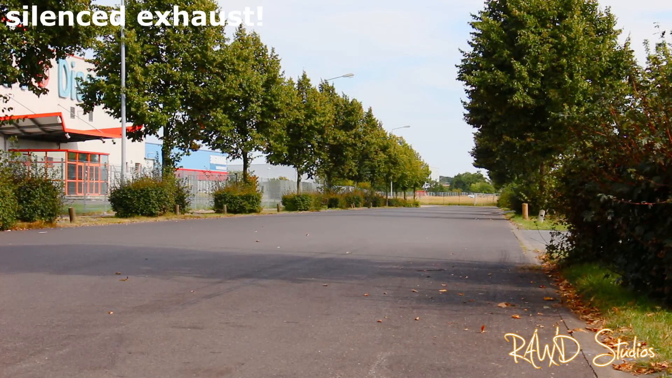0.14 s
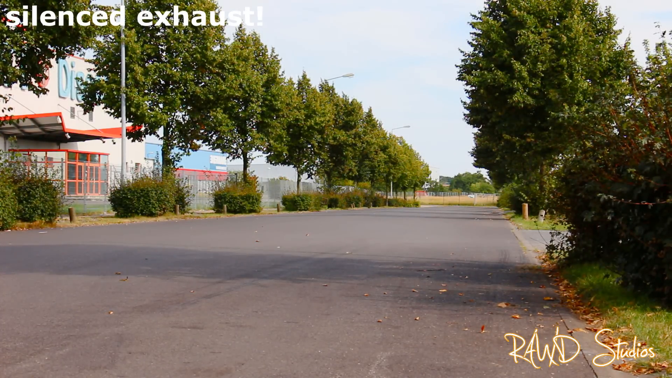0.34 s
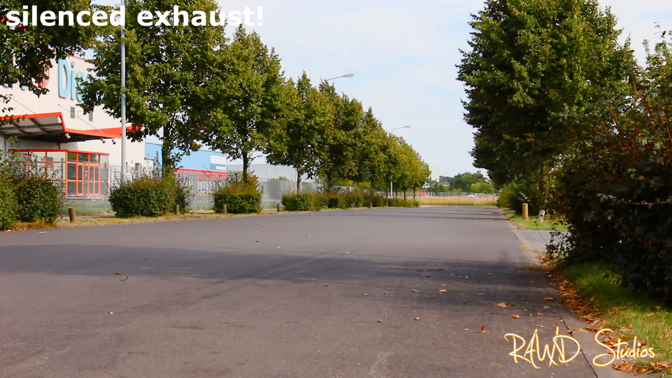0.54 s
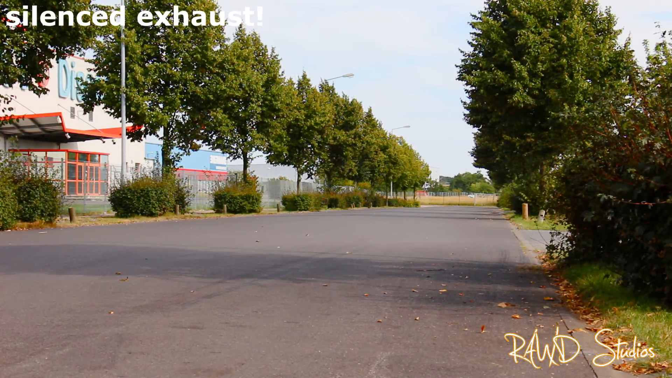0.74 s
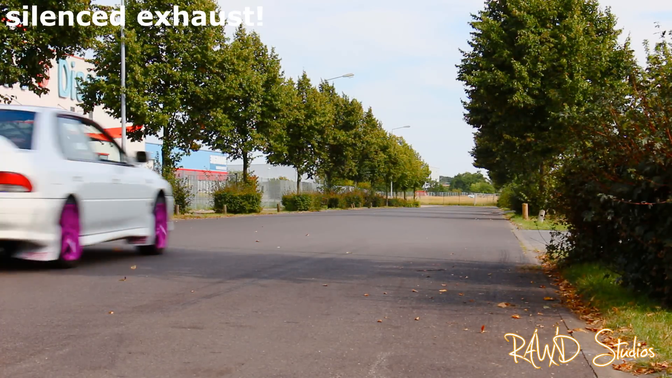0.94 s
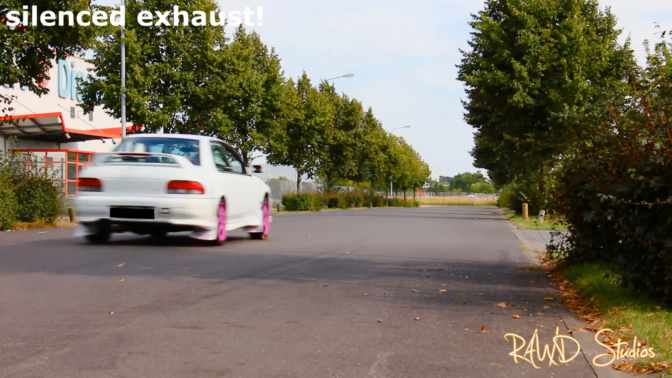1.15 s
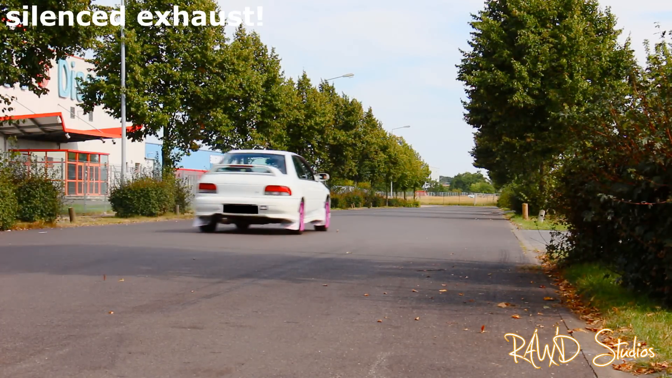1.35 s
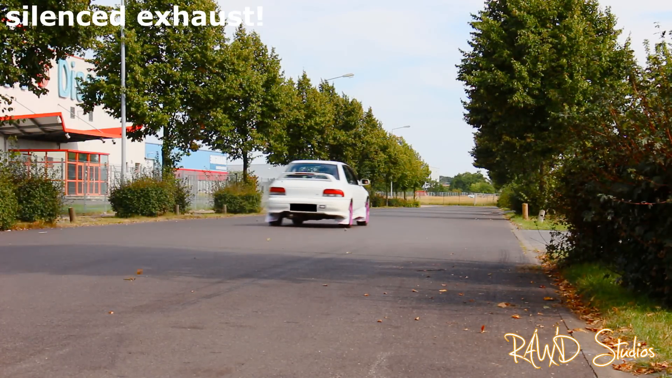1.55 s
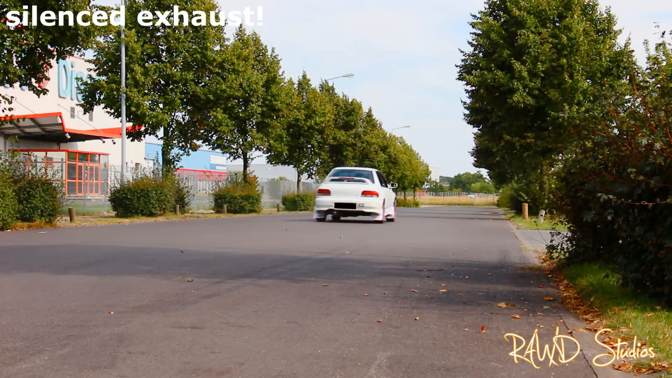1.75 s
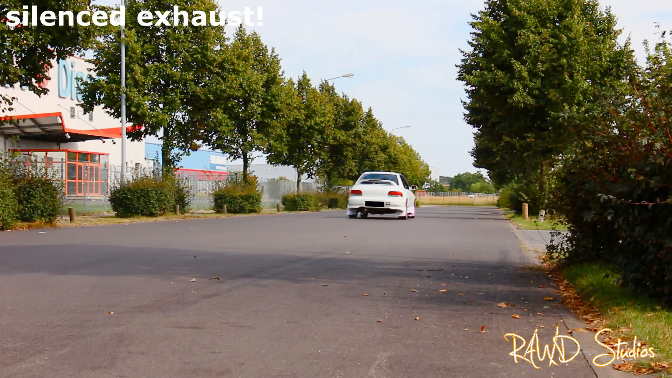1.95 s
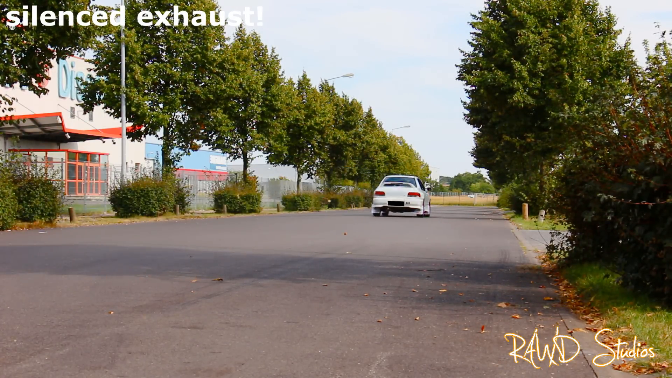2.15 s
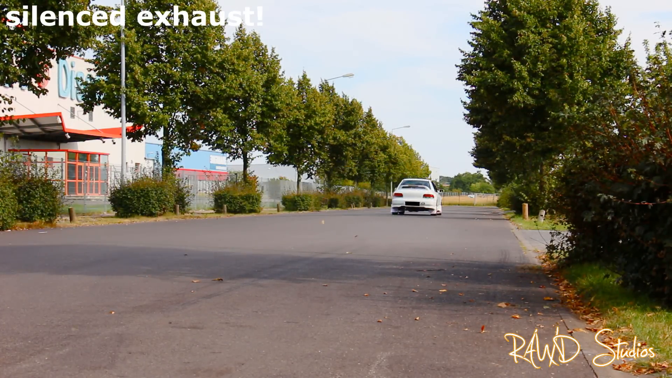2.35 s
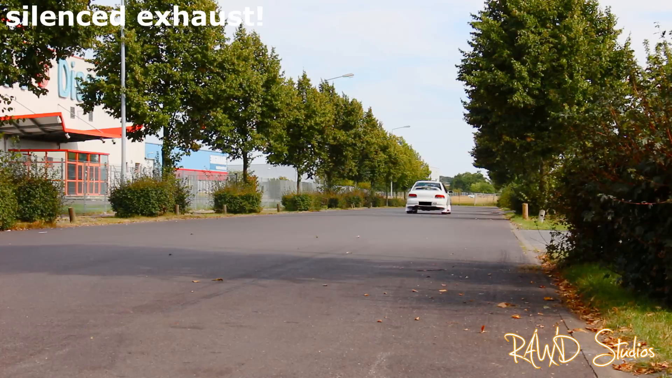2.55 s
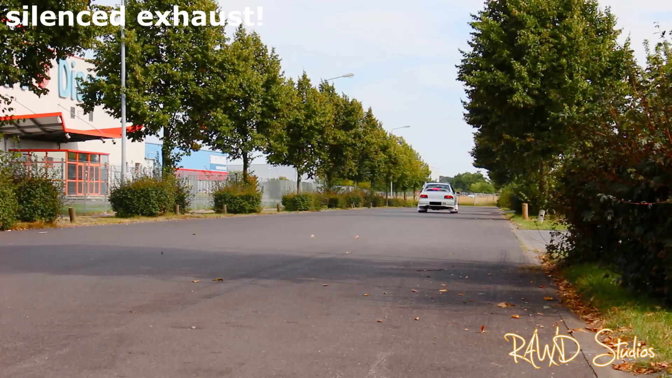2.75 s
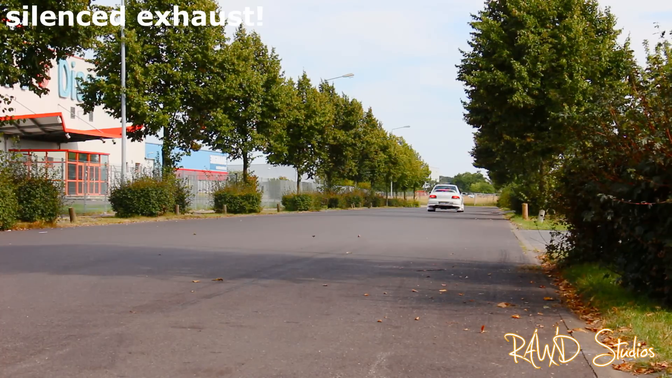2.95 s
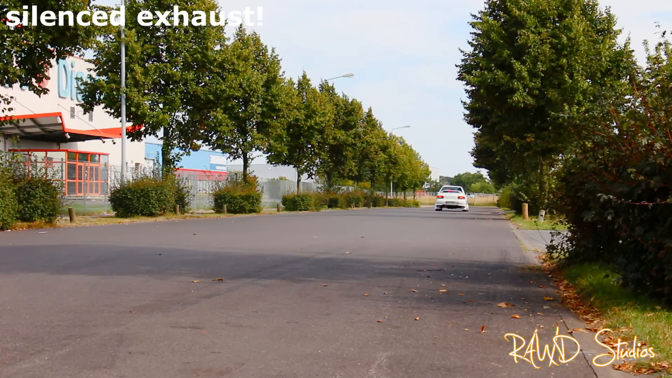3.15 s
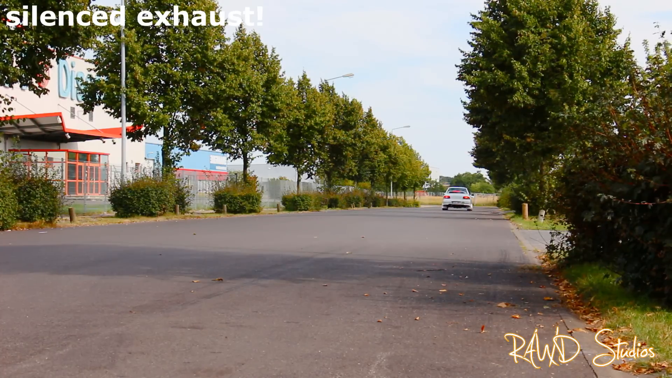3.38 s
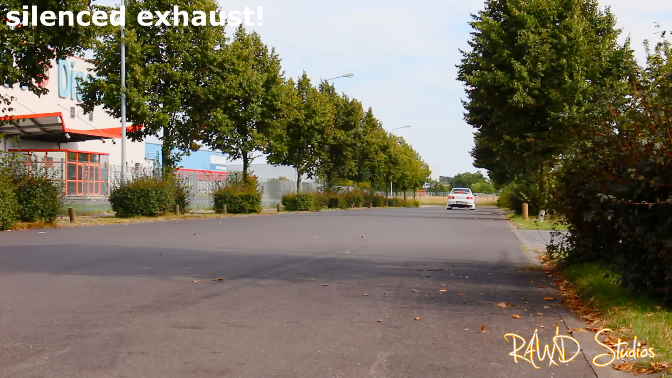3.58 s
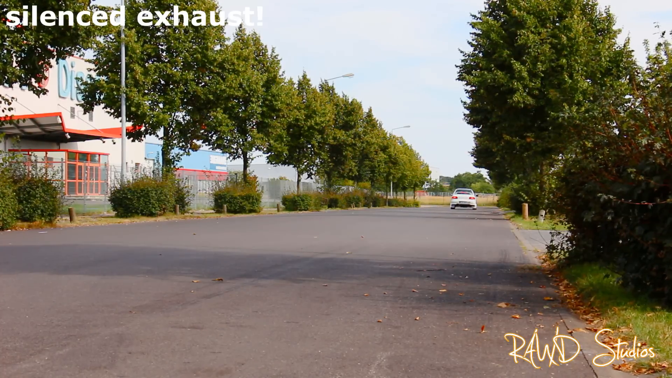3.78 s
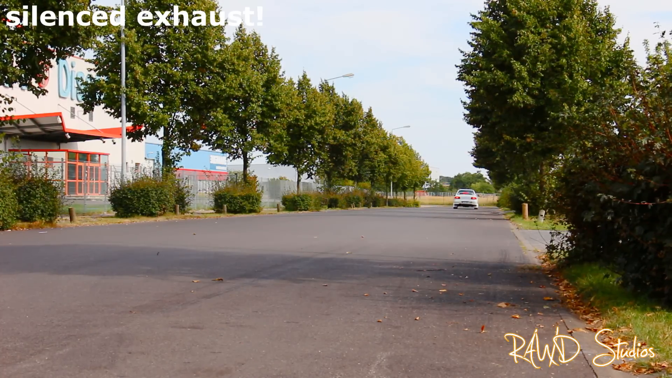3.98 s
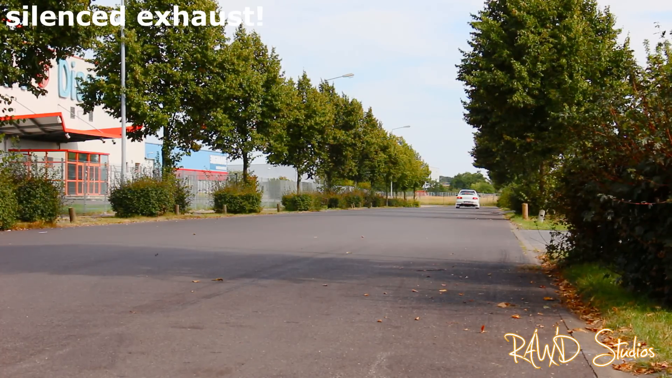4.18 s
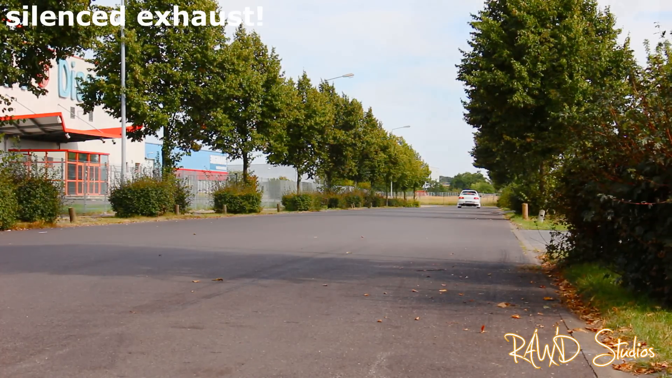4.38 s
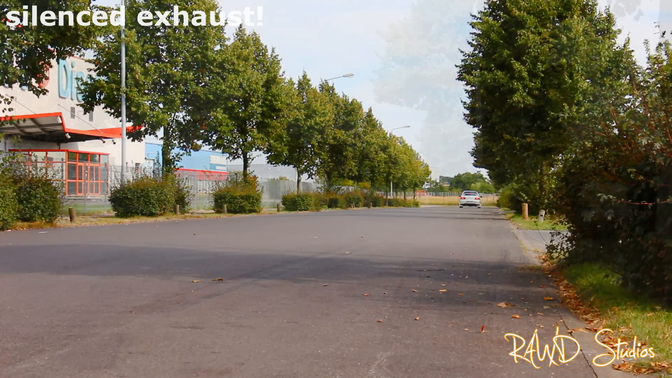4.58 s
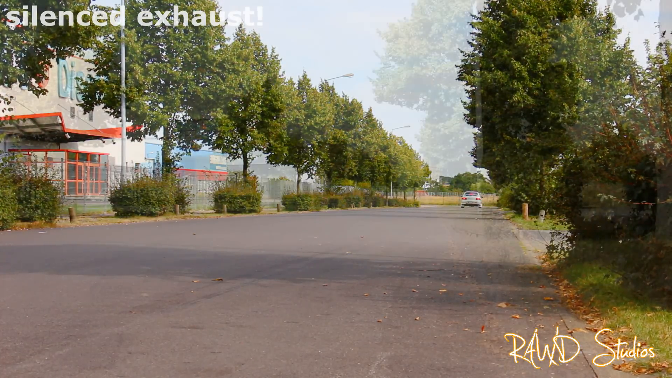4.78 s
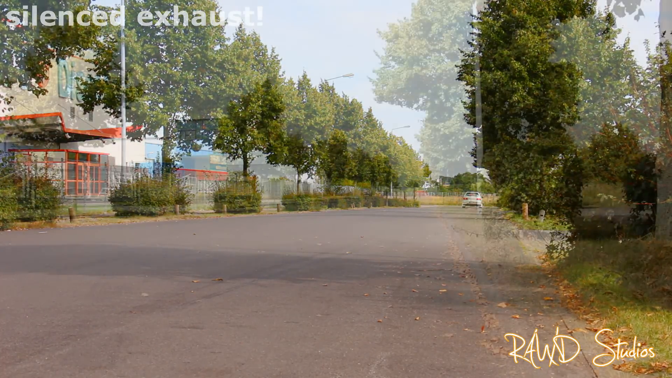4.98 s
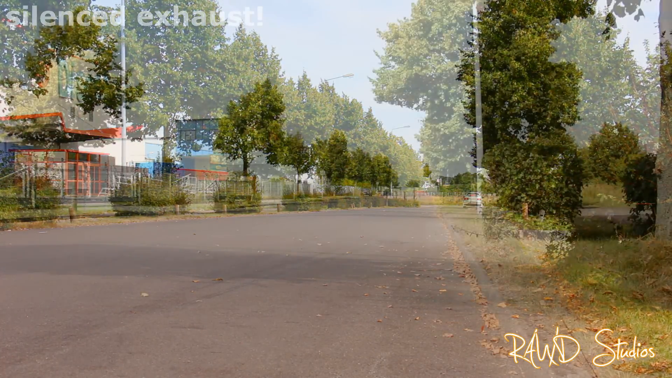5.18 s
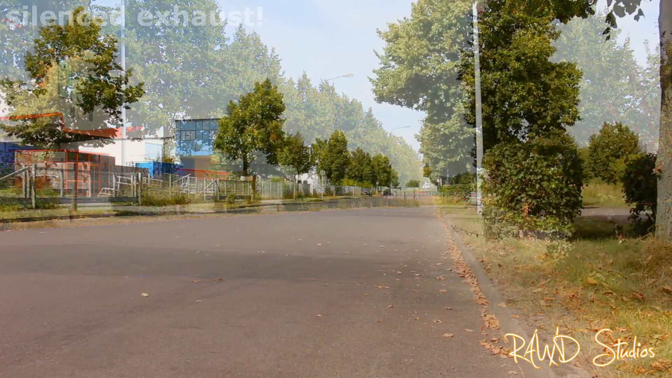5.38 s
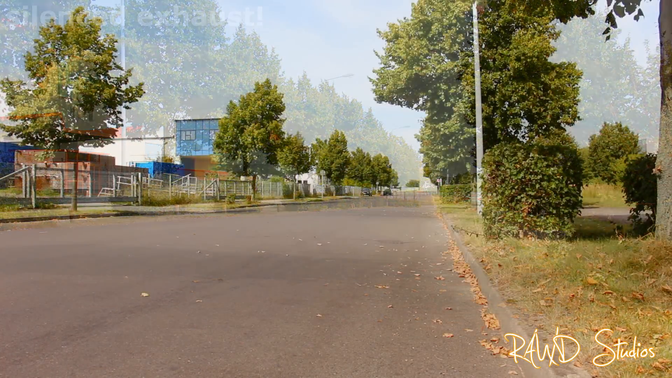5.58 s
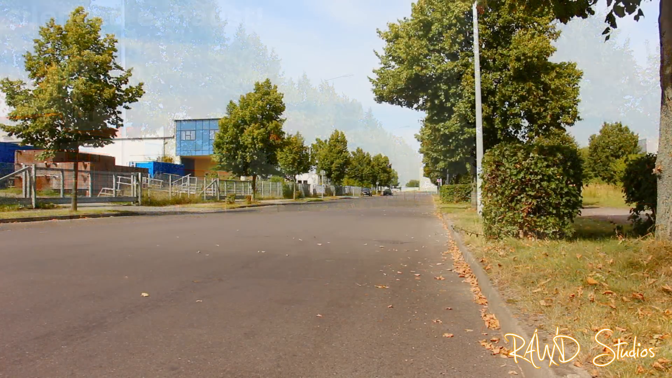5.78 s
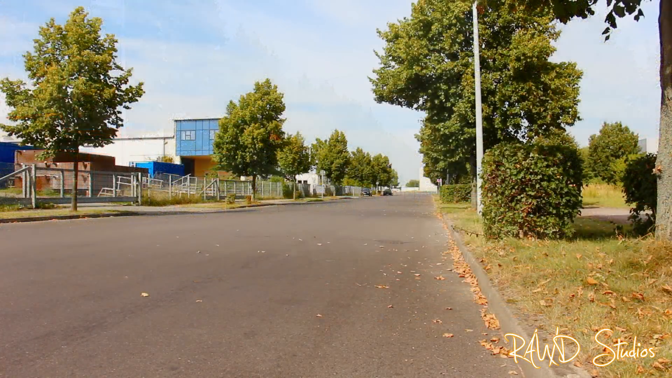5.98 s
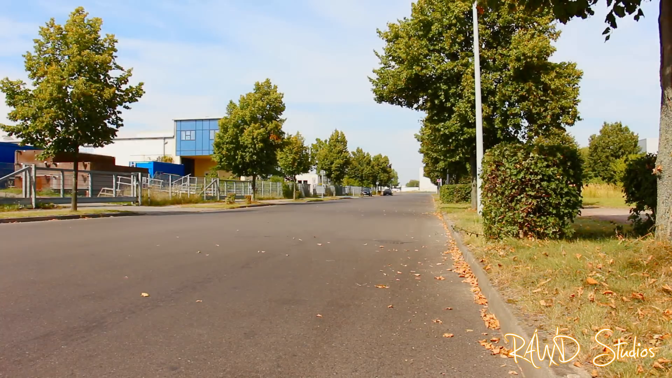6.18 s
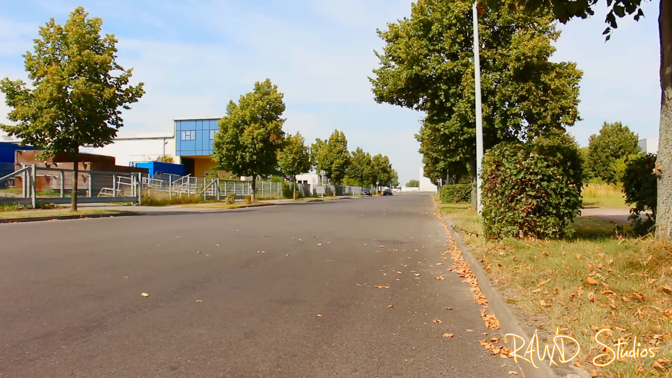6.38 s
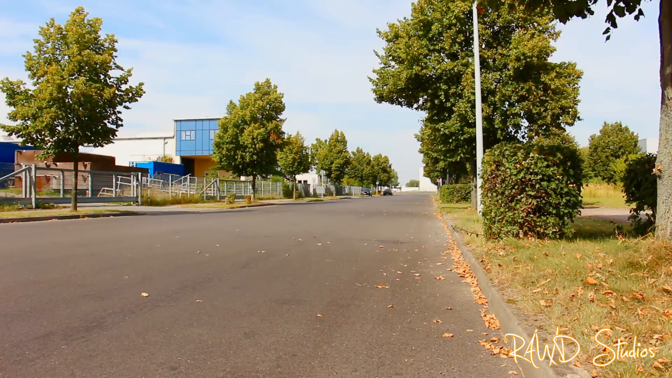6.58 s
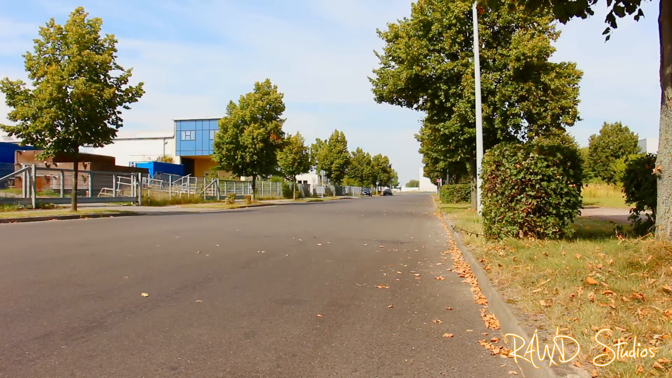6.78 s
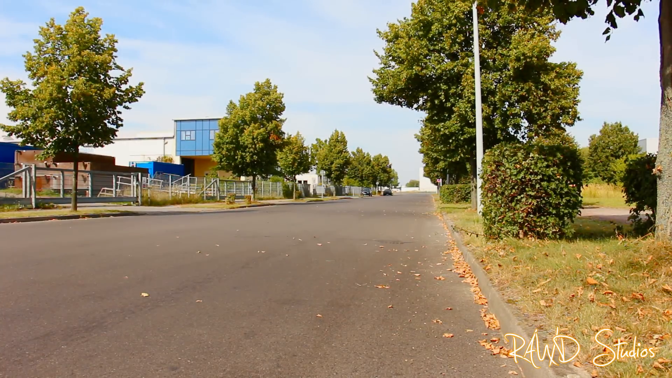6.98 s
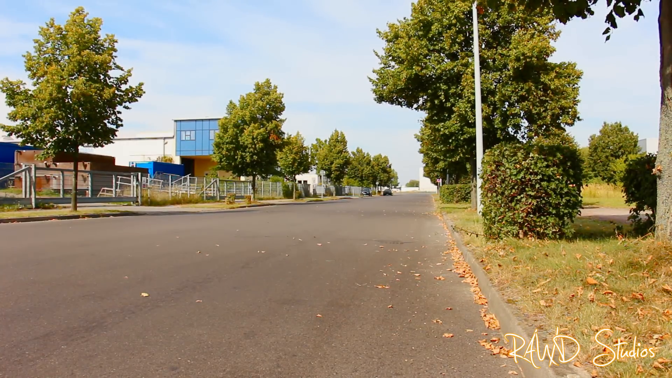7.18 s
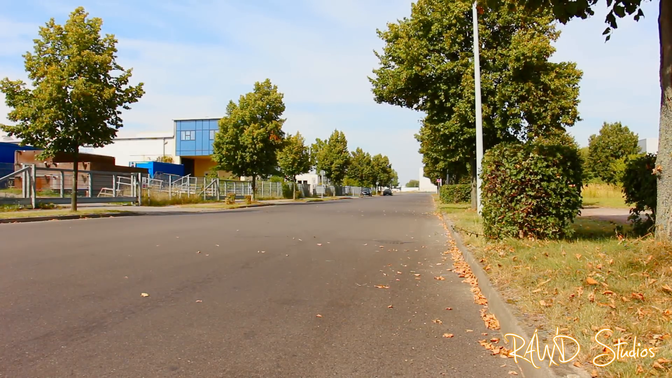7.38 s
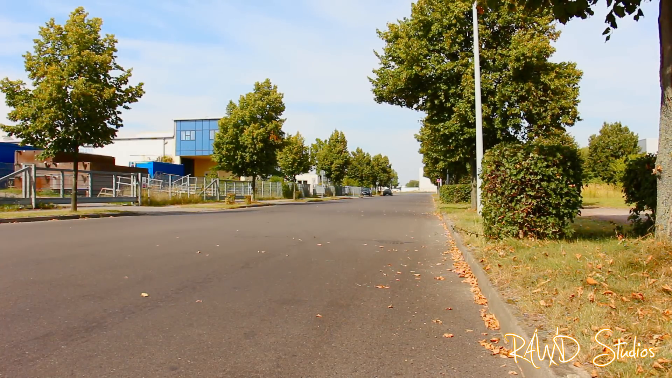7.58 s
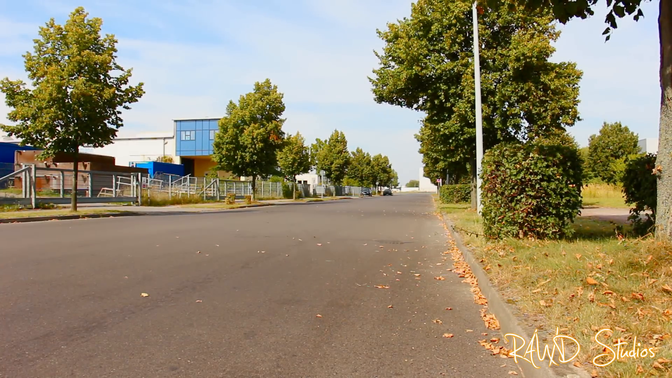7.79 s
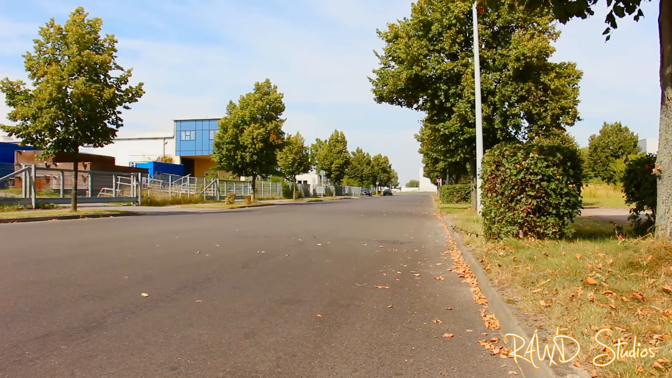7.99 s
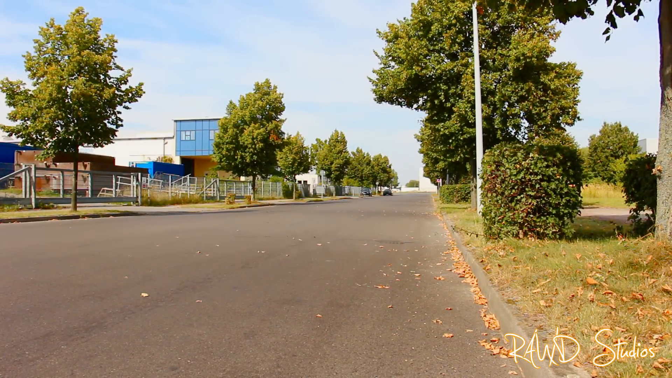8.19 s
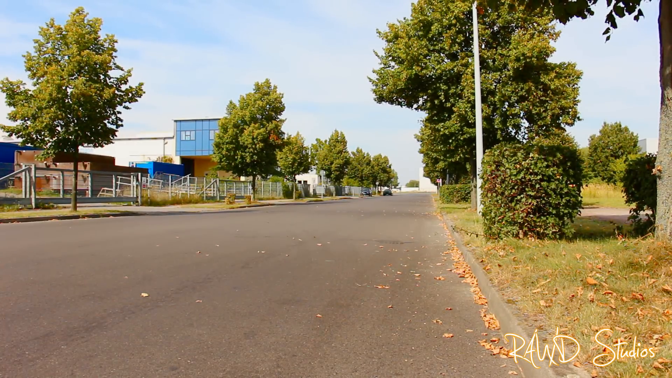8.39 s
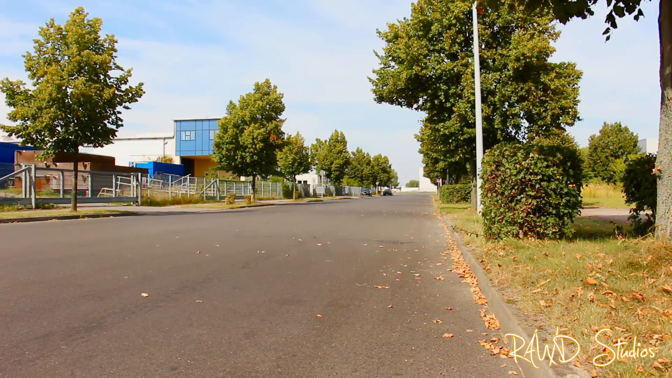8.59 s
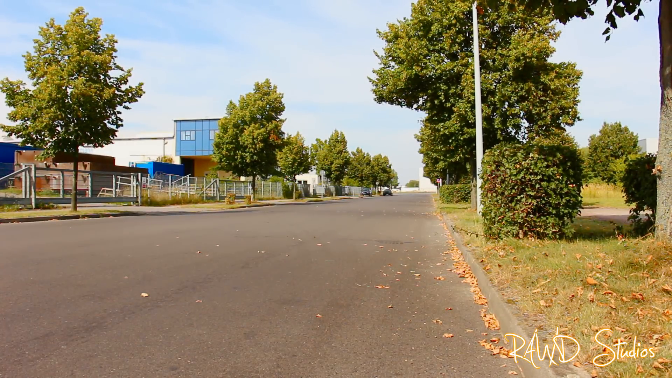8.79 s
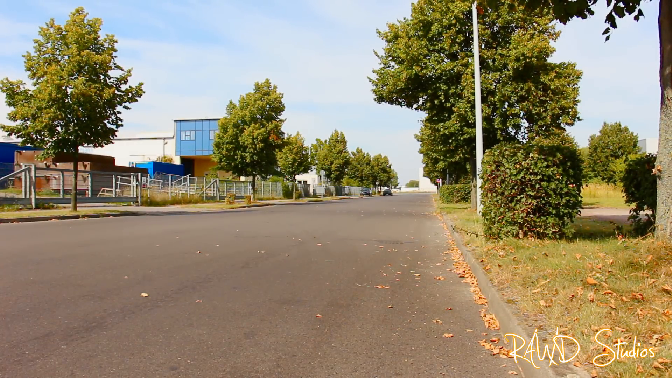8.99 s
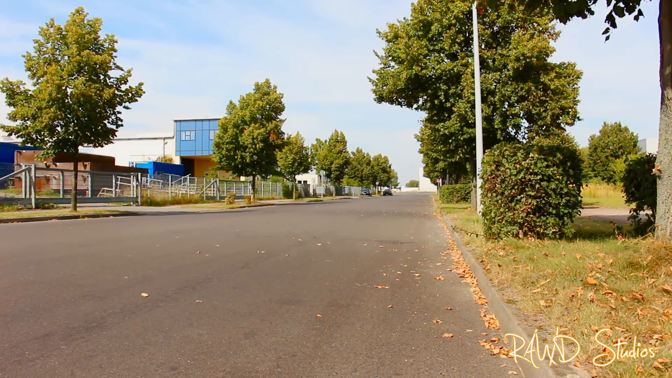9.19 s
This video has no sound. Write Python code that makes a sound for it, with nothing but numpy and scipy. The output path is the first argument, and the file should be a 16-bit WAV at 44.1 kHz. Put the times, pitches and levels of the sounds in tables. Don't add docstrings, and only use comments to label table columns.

```python
import sys
import numpy as np
from scipy import signal
from scipy.fft import rfft, irfft, next_fast_len
from scipy.io import wavfile
from scipy.ndimage import uniform_filter1d

SR = 44100
rng = np.random.default_rng(int(sys.argv[2]) if len(sys.argv) > 2 else 0)


def natural_amplitude(level_db):
    exponent = np.asarray(level_db, float) / 20
    return 10 ** exponent


def store_wav(level_fs):
    pcm = np.round(np.clip(np.atleast_2d(level_fs), -1, 1) * 32767)
    wavfile.write(sys.argv[1], SR, pcm.T.astype(np.int16))


N = 407484


def clock():
    return np.arange(N) / SR


def rms_one(x):
    return x / np.sqrt(np.mean(x ** 2) + 1e-20)


def in_time(rows):
    seconds, *columns = np.transpose(rows)
    return [np.interp(clock(), seconds, column) for column in columns]


def at_hz(points, hz):
    table_hz, table_db = np.array(points)[:, 0], np.array(points)[:, 1]
    return np.interp(np.log(hz), np.log(table_hz), table_db)


def drift(rate):
    r = np.exp(-80 * np.pi * rate / SR)
    noise = rng.standard_normal(N // 40 + 2002)
    slow = signal.lfilter([1], [1, -2 * r, r * r], noise)[2000:]
    return np.interp(np.arange(N) / 40, np.arange(len(slow)), rms_one(slow))


def coloured(spectrum, x=None, late_ms=0):
    size = next_fast_len(N)
    hz = np.fft.rfftfreq(size, 1 / SR) + 1
    inside = (hz > spectrum[0][0]) & (hz < spectrum[-1][0])
    x = rng.standard_normal(N) if x is None else x
    late = np.exp(1j * np.pi * late_ms / 1000 * (hz - 700) ** 2)
    return rms_one(irfft(rfft(x, size) * natural_amplitude(at_hz(spectrum, hz)) * inside * late, size)[:N])


def heard(start_s, end_s, fade_s):
    t = clock()
    return np.clip((t - start_s) / fade_s[0], 0, 1) * np.clip((end_s - t) / fade_s[1], 0, 1)


def bump(centre_s, length_s):
    return np.exp(-((clock() - centre_s) / length_s) ** 2)


def crank(cycle_hz, jitter):
    return np.cumsum(cycle_hz * (1 + jitter * drift(17))) / SR


def order_tone(order, cycles):
    return np.sqrt(2) * np.sin(2 * np.pi * (order * cycles + rng.random()))


def boom(cycle_hz, cycles, box, orders_db, waver_db):
    out = 0
    for order, db in zip(range(2, 6), orders_db):
        out = out + natural_amplitude(db + at_hz(box, order * cycle_hz) + waver_db * drift(7.2)) * order_tone(order, cycles)
    return out


# frequency in Hz, level in dB.
LIFT_PIPE = [(150, -38), (290, -18), (390, -28), (455, -12), (515, -11), (570, -2), (615, 0), (670, -12),
             (720, -22), (1100, -36)]


def bark(cycles, firing, pipe, bark_rows, slow_db, each_db, rough, spare_db, late_ms):
    pulses = np.zeros(N + SR)
    for k, (db, lag_ms, rich_ms) in enumerate(firing):
        at = np.flatnonzero(np.diff(np.floor(cycles - k / 4)))
        burning = np.clip(spare_db[at] / 6, 0, 1)
        lag = (lag_ms + (rich_ms - lag_ms) * burning) * SR / 1000
        strength_db = db + slow_db * drift(3)[at] + each_db * rng.standard_normal(len(at))
        strength_db = strength_db + (k == 0) * spare_db[at]
        pulses[at + lag.astype(int)] += natural_amplitude(strength_db)
    lift = spare_db / 11
    usual = coloured(pipe, pulses[:N], late_ms)
    ringing = coloured(LIFT_PIPE, pulses[:N], late_ms)
    rung = (1 - lift) * usual + lift * ringing
    rung = rung / np.sqrt(uniform_filter1d(rung ** 2, size=8000) + 1e-9)
    return natural_amplitude(in_time(bark_rows)[0]) * (np.sqrt(1 - rough) * rung + np.sqrt(rough) * coloured(pipe))


FRONT_UNEVEN = [4.5, -0.5, -2, -1.5]


def drone(cycle_hz, cycles, pipe, bark_db, rough, count):
    out, power = 0, 1e-12
    for order in range(6, count):
        gain = natural_amplitude(at_hz(pipe, order * cycle_hz) + FRONT_UNEVEN[order % 4])
        waver = natural_amplitude(3.5 * drift(6) - 2)
        out = out + gain * waver * order_tone(order, cycles + .15 * drift(6) / order)
        power = power + np.minimum(gain, 1) ** 2
    puffs = coloured(pipe[2:]) * (1 + .6 * np.cos(8 * np.pi * cycles))
    return natural_amplitude(bark_db) * (np.sqrt(1 - rough) * out / np.sqrt(power) + np.sqrt(rough) * puffs)


def wall_ring(cycles):
    swell = np.interp(clock(), [1, 1.1, 1.17], [0, 1, 0])
    return -natural_amplitude(-0.5) * swell * np.sin(2 * np.pi * 15 * cycles)


# time in seconds, engine cycles in Hz.
PULL_SPEED = [(0, 42.8), (.052, 43.8), (.46, 48.2), (.644, 49.7), (.914, 49.4), (1.084, 50.5),
              (1.496, 53.8), (1.836, 56.2), (1.9, 56.1)]
# time in seconds, boom level in dB.
PULL_BOOM = [(0, -16), (.45, -17.5), (.6, -15), (.75, -15.5), (1.0, -10.5), (1.2, -18.5), (1.5, -23),
             (1.9, -27)]
# frequency in Hz, level in dB.
SIDE_BOX = [(90, -6.5), (140, -2.5), (160, -1.5), (200, 1), (280, 1)]
# time in seconds, level in dB.
SIDE_BARK = [(0, -22.5), (.3, -20.5), (.6, -19), (1.0, -44.5), (1.9, -65)]
# frequency in Hz, level in dB.
SIDE_PIPE = [(200, 13), (270, -4.5), (360, -6), (430, -3), (600, -20), (900, -35)]
# strength in dB, lag in ms, lag in ms while spare fuel burns.
OPEN_FIRING = [(0, 0, 0), (-1, 0, 0), (0, .5, .5), (-1, .5, .5)]
# frequency in Hz, level in dB.
OPEN_PIPE = [(340, -20), (398, -21), (450, 7), (540, 11), (630, 6.5), (760, 1), (850, 0.5), (1100, -28.5),
             (2000, -13), (2600, -22)]
# time in seconds, level in dB.
OPEN_BARK = [(0, -25), (.25, -23.5), (.5, -16.5), (.72, -3), (1.1, -0.5), (1.5, -3.5), (1.9, -7.5)]


def full_throttle():
    cycle_hz, = in_time(PULL_SPEED)
    cycles = crank(cycle_hz, jitter=.001)
    pull = natural_amplitude(in_time(PULL_BOOM)[0]) * boom(cycle_hz, cycles, SIDE_BOX, [-12, -8, -1.5, -9], waver_db=1.5)
    pull = pull + drone(cycle_hz, cycles, SIDE_PIPE, in_time(SIDE_BARK)[0], rough=.05, count=12)
    pull = pull + bark(cycles, OPEN_FIRING, OPEN_PIPE, OPEN_BARK, slow_db=2.0, each_db=1.5, rough=.07,
                       spare_db=np.zeros(N), late_ms=0)
    pull = pull + wall_ring(cycles)
    return heard(PULL_SPEED[0][0], PULL_SPEED[-1][0], (1e-4, .004)) * pull


def traffic():
    swell = np.interp(clock(), [2.7, 4.4, 5.6, 6.25], [0, 1, 1, 0])
    return natural_amplitude(9.5 * (swell - 1)) * heard(2.7, 6.25, (.9, .15))


# frequency in Hz, level in dB per Hz.
TYRE_COLOUR = [(410, -38), (700, -13), (821, 4), (944, -0.5), (1220, 4.5), (1480, 1.5), (1800, -3.5),
               (1900, -8), (2300, -17.5), (2990, -18), (5060, -120)]


def tyres(road_db):
    over_road_db = np.where(clock() < 4.4, 5.5, -4)
    power = natural_amplitude(road_db + over_road_db) ** 2 + natural_amplitude(-38) ** 2 + (natural_amplitude(-23.5) * traffic()) ** 2
    return np.sqrt(power) * natural_amplitude(drift(3.3)) * coloured(TYRE_COLOUR)


# frequency in Hz, level in dB per Hz.
ROAD_COLOUR = [(1300, -24), (2000, -4), (2600, -3), (3400, -1), (4300, -5), (5500, -12), (7500, -20),
               (10000, -34)]


def road_hiss(road_db, flutter):
    return natural_amplitude(road_db + 1.3 * flutter) * coloured(ROAD_COLOUR)


# frequency in Hz, level in dB per Hz.
TURBO_NEAR_COLOUR = [(2940, -31), (5000, 0), (9440, 2), (12700, 0), (15100, -2.5), (15500, -4)]
# frequency in Hz, level in dB per Hz.
TURBO_FAR_COLOUR = [(2940, -39), (5000, -14), (5390, -5.5), (6370, -3.5), (9220, -6.5), (15500, -31)]
# time in seconds, share of near hiss from 0 to 1.
NEAR_SHARE = [(0, 0.87), (.9, 0.96), (1.9, 0.17), (4.0, 0.3), (4.5, 0.5), (6.0, 0.5), (6.4, 0.01),
              (8.6, 0.04), (9.24, 0.44)]


def turbo(road_db, boost_db, flutter):
    turbo_db = -38 + 1.23 * (road_db + 28) + boost_db
    near = np.clip(in_time(NEAR_SHARE)[0], 0, 1)
    whoosh = np.sqrt(near) * coloured(TURBO_NEAR_COLOUR) + np.sqrt(1 - near) * coloured(TURBO_FAR_COLOUR)
    return natural_amplitude(turbo_db + 0.45 * flutter) * whoosh


# time in seconds, road hiss in dB, boost in dB.
CLOSENESS = [(0, -32.5, 14.5), (.42, -33, 15), (.55, -29, 18), (.78, -25, 9.5), (1.08, -24.5, 2.5),
             (1.46, -28.5, 2), (1.86, -34, 4), (1.92, -42.5, 5), (2.7, -48, -2.5), (3.9, -45.5, -1.5),
             (4.8, -42.5, 3), (5.97, -43, 5), (6.3, -45, 2.5), (6.95, -38.5, 3.5), (7.41, -28, 0),
             (8.2, -39, 1), (8.77, -35, 7.5), (9.24, -35.5, 10.5)]


def rush():
    road_db, boost_db = in_time(CLOSENESS)
    flutter = drift(6.2)
    return tyres(road_db) + road_hiss(road_db, flutter) + turbo(road_db, boost_db, flutter)


# frequency in Hz, level in dB per Hz.
RUMBLE_COLOUR = [(18, -22), (30, 3), (60, 6), (120, 5.5), (250, -21), (500, -5), (800, -18)]
# time in seconds, peak in dB, length in seconds.
LOW_GUSTS = [
    (0.304, -34, 0.25),
    (2.78, -33, 0.083),
    (3.895, -41, 0.07),
    (6.935, -30, 0.3),
    (7.673, -20.5, 0.21),
    (8.315, -32, 0.32),
    (9.1, -40, 0.24),
]


def rumble():
    level = natural_amplitude(-44) + natural_amplitude(-24) * traffic() ** 3.2
    for s, db, length_s in LOW_GUSTS:
        level = level + natural_amplitude(db) * bump(s, length_s)
    return level * natural_amplitude(2.1 * drift(3.4)) * coloured(RUMBLE_COLOUR)


# time in seconds, engine cycles in Hz.
COAST_SPEED = [(1.9, 51.5), (1.99, 51.7), (2.2, 47.8), (2.36, 45.2), (3.0, 33.7), (3.43, 27.6),
               (3.79, 23.3), (4.56, 14.9), (5.1, 11.4)]
# frequency in Hz, level in dB.
REAR_BOX = [(30, -51), (55, -30.5), (72, -36), (100, -21), (135, -39), (175, -31.5), (205, -49), (260, -31)]
# time in seconds, extra level in dB.
SPARE_BURN = [(1.9, 11), (2.2, 11), (2.3, 6), (2.75, 6), (3.2, 4), (3.5, 0)]
# strength in dB, lag in ms, lag in ms while spare fuel burns.
SHUT_FIRING = [(0, 0, 0), (-2, 0, .65), (-1, .85, .15), (-2, .85, .65)]
# frequency in Hz, level in dB.
REAR_PIPE = [(110, -29.5), (175, -5.5), (215, -22), (300, -24), (390, -12), (450, 6.5), (540, 4),
             (620, 1.5), (700, -14), (900, -16), (1200, -19)]
# time in seconds, level in dB.
SHUT_BARK = [(1.9, -12), (1.912, -23), (2.0, -13), (2.18, -16), (2.4, -14), (2.75, -18), (3.66, -18),
             (4.3, -24.5), (5.1, -29)]


def coasting():
    cycle_hz, = in_time(COAST_SPEED)
    cycles = crank(cycle_hz, jitter=.0015)
    start_s, end_s = COAST_SPEED[0][0], COAST_SPEED[-1][0]
    coast = boom(cycle_hz, cycles, REAR_BOX, [-25.5, 0.5, 1.5, -6], waver_db=1.5) * heard(start_s, end_s, (.37, .01))
    stumble = natural_amplitude(np.interp(clock() - 2.197, [-.015, 0, .16], [0, -11, 0]))
    coast = coast + stumble * bark(cycles, SHUT_FIRING, REAR_PIPE, SHUT_BARK, slow_db=2.0, each_db=.8, rough=.1,
                                   spare_db=in_time(SPARE_BURN)[0], late_ms=.06)
    return heard(start_s, end_s, (.005, .4)) * coast


def crackle(rows, spectrum):
    level = 0
    for s, db, length_s in rows:
        level = level + natural_amplitude(db) * bump(s, length_s)
    return coloured(spectrum) * level


# time in seconds, peak in dB, length in seconds.
FUEL_POPS = [
    (1.99, -35, .002),
    (2.01, -35, .002),
    (2.03, -35, .002),
    (2.048, -38, .002),
    (2.068, -35, .002),
    (2.128, -38, .002),
    (2.148, -30, 0.0017),
    (2.168, -35, 0.0018),
    (2.236, -34, 0.0034),
]


def pops():
    return crackle(FUEL_POPS, [(2000, -10), (3300, 1), (5000, -14), (8000, -22)])


# time in seconds, peak in dB, length in seconds.
LEAF_TICKS = [
    (3.66, -41, 0.0034),
    (4.34, -46, .002),
    (4.838, -38, .002),
    (4.862, -45, .006),
    (4.865, -45, 0.041),
    (4.878, -28, 0.0012),
    (5.16, -36, 0.0022),
    (5.195, -36, .002),
    (5.553, -25.5, 0.004),
]


def leaves():
    return crackle(LEAF_TICKS, [(2000, 14), (5000, -6), (10000, -1), (15500, -17)])


# time in seconds, engine cycles in Hz.
COMING_SPEED = [(4.4, 17.1), (4.68, 19.1), (4.94, 21.3), (5.17, 23.7), (5.25, 25.6), (5.64, 30.9),
                (6.04, 37.4), (6.23, 40.2), (6.77, 51.8), (7.3, 64.9), (7.5, 70.1), (7.55, 70.6),
                (7.62, 64.3), (8.08, 51.8), (8.17, 47.4), (8.42, 43.3), (9.05, 48.7), (9.24, 50.5)]
# time in seconds, boom level in dB, bark level in dB.
COMING_EFFORT = [(4.4, -25, -37.5), (4.7, -22.5, -37.5), (5.2, -18.5, -30), (5.6, -19.5, -27),
                 (6.3, -20, -28.5), (6.9, -20, -28), (7.05, -16.5, -27.5), (7.5, -22.5, -23),
                 (7.62, -22.5, -23), (7.82, -11, -28), (8.18, -14, -33.5), (8.25, -23, -33),
                 (8.35, -16.5, -28), (8.6, -16, -24), (9.24, -14, -24)]
# frequency in Hz, level in dB.
FRONT_BOX = [(50, -4), (70, -10), (120, 1), (205, -.5), (225, -9), (255, -8), (285, -11), (340, -18)]
# frequency in Hz, level in dB.
FRONT_PIPE = [(100, 21), (160, 19.5), (190, 6), (250, -5.5), (320, -5), (420, -8), (550, -10), (800, -7),
              (1100, -18)]
PULL_ORDERS_DB, SHIFT_ORDERS_DB = [-23.5, -4.5, 0.5, -4], [-18, -.5, -11, -24]


def second_run():
    cycle_hz, = in_time(COMING_SPEED)
    boom_db, bark_db = in_time(COMING_EFFORT)
    clutch = heard(7.6, 8.22, (.05, .05))
    orders_db = [pull + (shift - pull) * clutch for pull, shift in zip(PULL_ORDERS_DB, SHIFT_ORDERS_DB)]
    growl_from_hz = 58.7
    growl_db = 3 * np.clip(cycle_hz - growl_from_hz, 0, 7.5) * (1 - clutch)
    orders_db = [orders_db[0] + growl_db] + [db - 0.32 * growl_db for db in orders_db[1:]]
    cycles = crank(cycle_hz, jitter=.004)
    waver_db = 1.5 + 2.5 * (cycle_hz > growl_from_hz) * (1 - clutch)
    direct = natural_amplitude(boom_db) * boom(cycle_hz, cycles, FRONT_BOX, orders_db, waver_db)
    rough = .35 + .35 * (np.abs(clock() - 7.6) < .6)
    direct = direct + drone(cycle_hz, cycles, FRONT_PIPE, bark_db, rough, count=15)
    direct = heard(COMING_SPEED[0][0], COMING_SPEED[-1][0], (.2, 1e-4)) * direct
    return direct + echo(cycle_hz, boom_db, bark_db)


# time in seconds, peak in dB, pitch in Hz, length in seconds.
WIND_THUMPS = [
    (4.732, -23, 34.2, 0.18),
    (5.57, -23, 45, 0.064),
    (7.564, -13.5, 115, 0.053),
    (7.582, -15, 50.7, 0.044),
    (7.758, -18, 96, 0.017),
    (8.19, -8, 129, 0.042),
    (8.22, -29, 50, .06),
]


def thumps():
    out = 0
    for s, db, hz, length_s in WIND_THUMPS:
        out = out + natural_amplitude(db) * bump(s, length_s) * np.sin(2 * np.pi * hz * (clock() - s))
    return out


def echo(cycle_hz, boom_db, bark_db):
    t = clock()
    left_s = t - .165 * (t - 5.1)
    cycle_hz, boom_db = np.interp(left_s, t, cycle_hz), np.interp(left_s, t, boom_db)
    cycles = crank(cycle_hz, jitter=.004)
    out = natural_amplitude(boom_db + 1.5) * boom(cycle_hz, cycles, FRONT_BOX, PULL_ORDERS_DB, waver_db=1.5)
    out = out + drone(cycle_hz, cycles, FRONT_PIPE, bark_db - 14.0, rough=1.0, count=10)
    return heard(5.6, 7.65, (.3, .1)) * out


def scene():
    first_run = full_throttle() + coasting()
    return (first_run + rush() + rumble() + pops() + leaves() + second_run() + thumps())[None]


def top_cut(x):
    return signal.sosfilt(signal.butter(12, 15690, fs=SR, output="sos"), x)


# time in seconds, peak level (1 is full scale).
INPUT_CEILING = [(0, 0.82), (.5, 0.3), (.8, 0.4), (1.9, 0.36), (1.92, 0.43), (9.24, 1)]


def record(dry):
    top, = in_time(INPUT_CEILING)
    flat = dry / (1 + np.abs(dry / top) ** 6.0) ** (1 / 6.0)
    return top_cut(flat)


dry = scene()
out = record(dry)
store_wav(out)
```